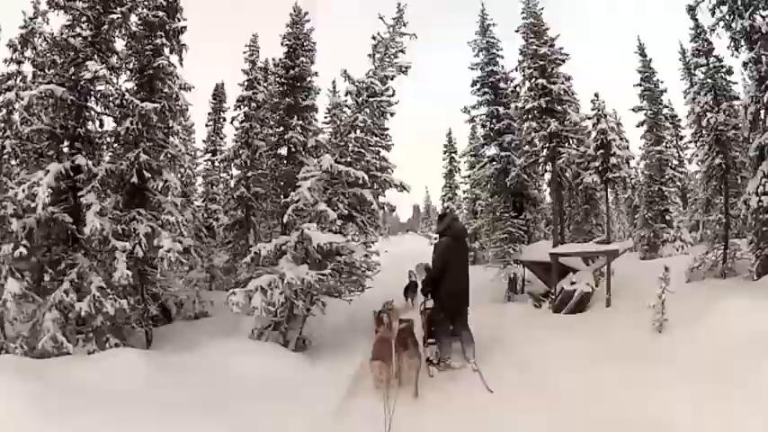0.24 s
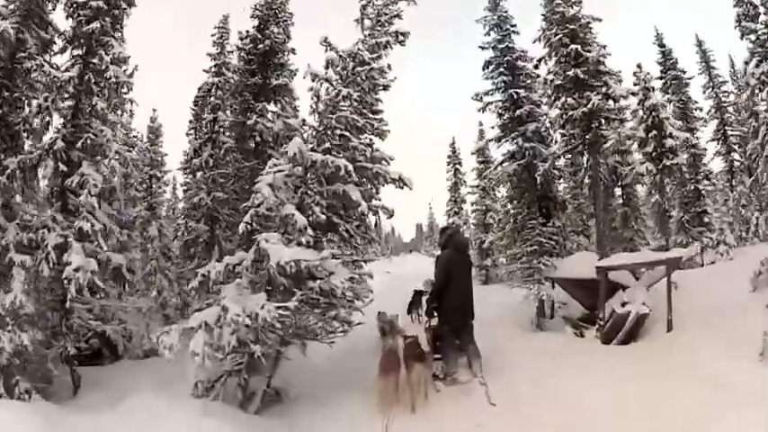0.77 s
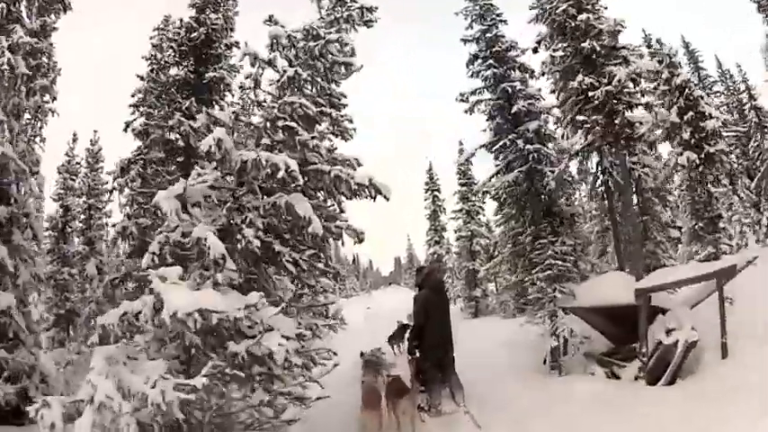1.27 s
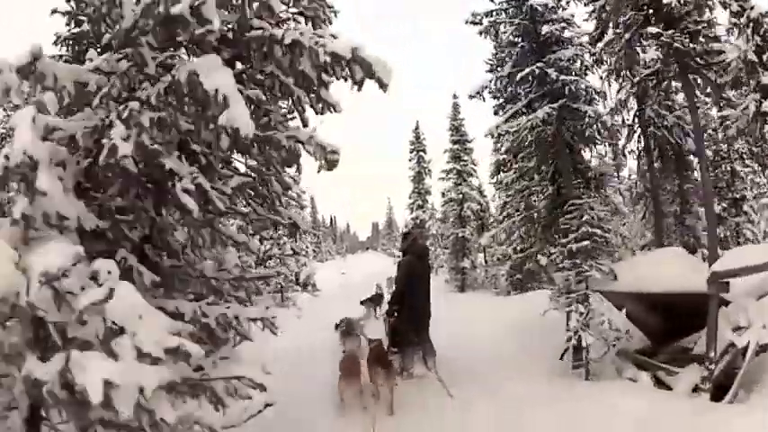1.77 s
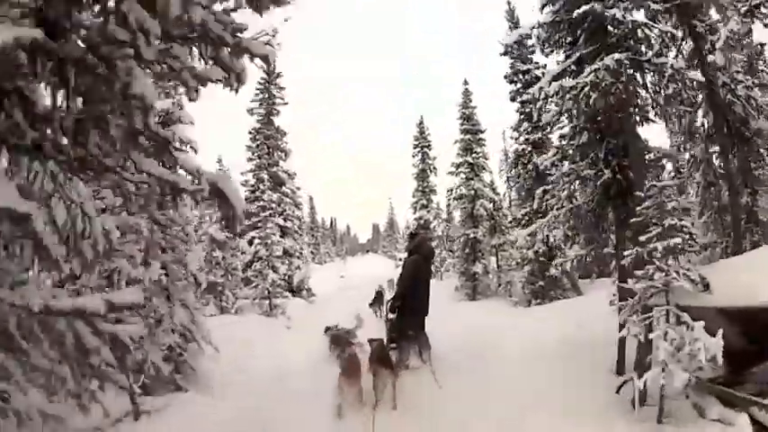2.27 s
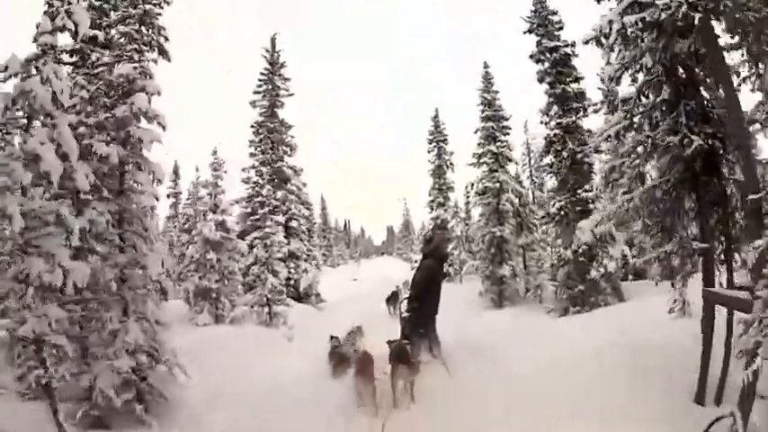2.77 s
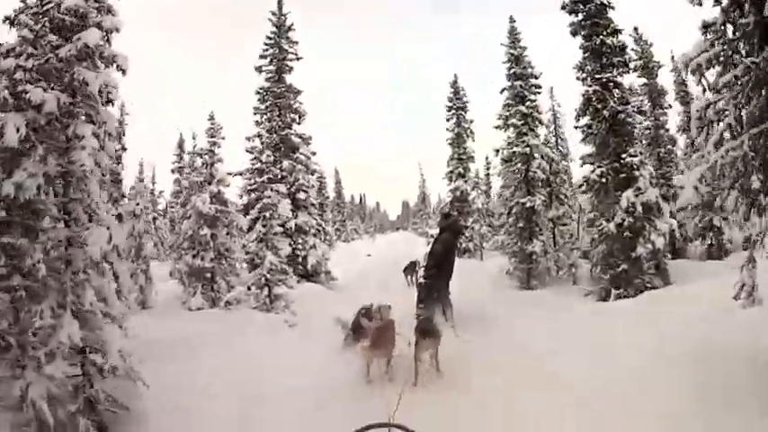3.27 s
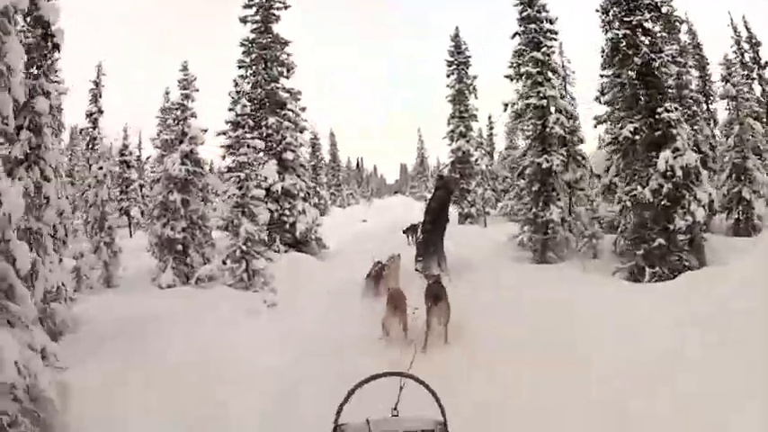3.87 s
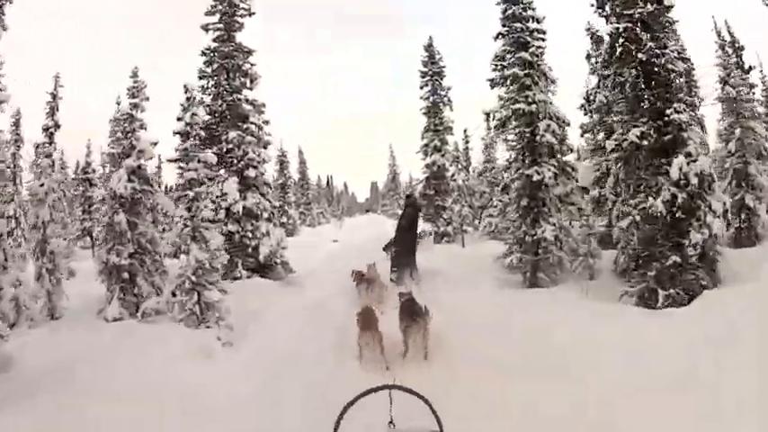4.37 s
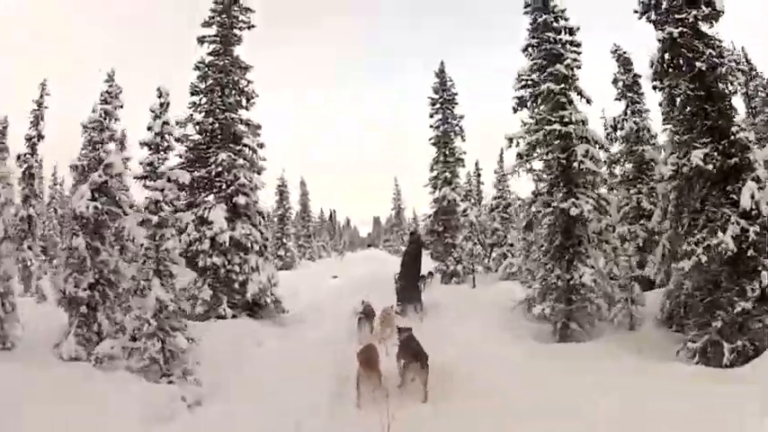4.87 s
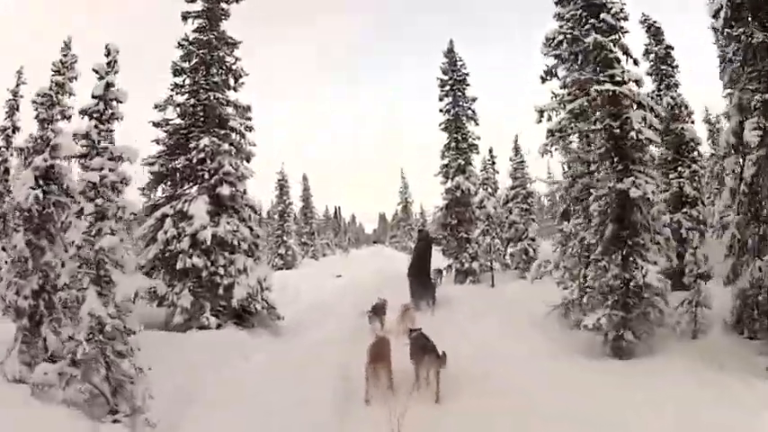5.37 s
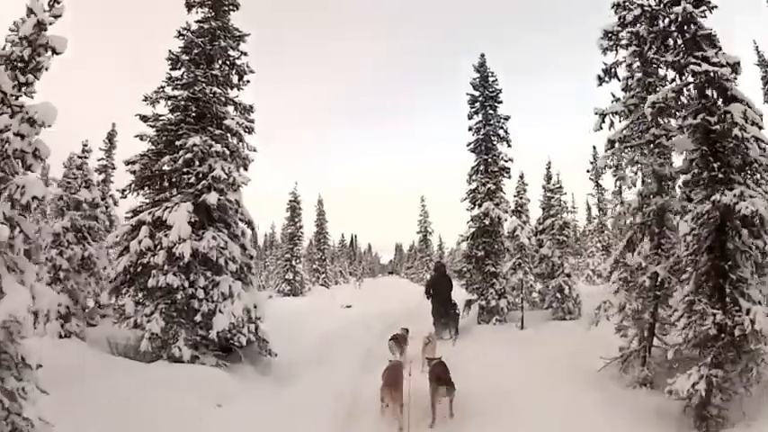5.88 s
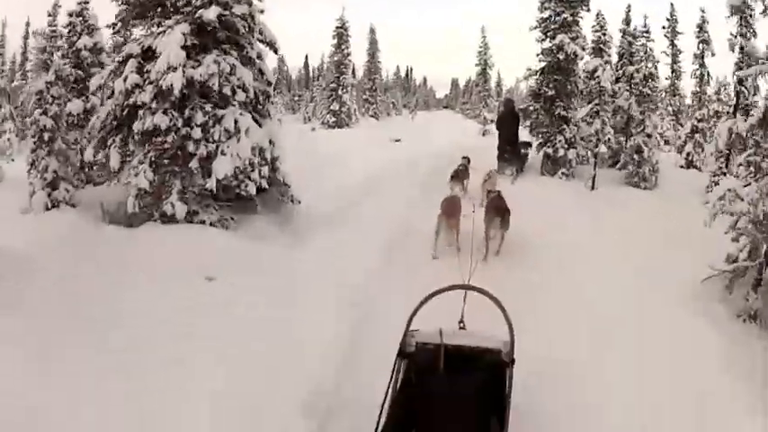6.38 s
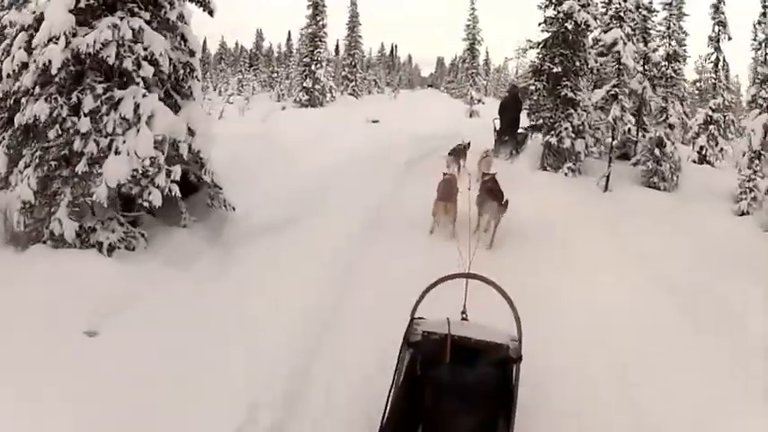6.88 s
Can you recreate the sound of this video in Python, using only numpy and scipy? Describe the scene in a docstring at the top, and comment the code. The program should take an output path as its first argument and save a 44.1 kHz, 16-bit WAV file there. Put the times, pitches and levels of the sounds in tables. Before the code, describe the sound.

Muffled low rumbling and hollow knocking of a dog sled gliding over a snowy forest trail, with soft wind thuds and faint snow hiss.

```python
"""Sled on a snowy forest trail

A sled glides along a trail, heard by a small camera in a sealed case. The frame is noise-driven resonances,
bumps ring the same modes, wind is deep lumpy noise, the runners hiss and a loose part ticks. Crust crunches,
cold snow squeaks and a branch brushes past over the microphone's own steady hiss. The converter holds each
of its 12000 samples a second, which mirrors the rumble into the treble."""
import sys
import numpy as np
from scipy import signal
from scipy.fft import rfft, irfft, next_fast_len
from scipy.io import wavfile
from scipy.ndimage import uniform_filter1d

SR = 44100
rng = np.random.default_rng(int(sys.argv[2]) if len(sys.argv) > 2 else 0)


def volts(x):
    """Linear amplitude factor 10**(x/20) for a level x in dB, scalar or array-like."""
    e = np.asarray(x, float) / 20
    return 10 ** e


def dump(signal):
    """Clip the signal to [-1, 1] and save it as 16-bit WAV at the path in sys.argv[1]."""
    limited = np.clip(np.atleast_2d(signal).T, -1, 1)
    pcm = np.round(limited * 32767).astype(np.int16)
    wavfile.write(sys.argv[1], SR, pcm)


N = 314874

# frame and case modes: (frequency [Hz], pole-pair width [Hz], relative level [dB])
FRAME_LOW = [(272.1, 37.9, 1.5), (313.8, 59, -1), (343.5, 94, -3)]
FRAME_HIGH = [(457, 93, 2), (524.4, 45.5, -0.5), (580.3, 110, -4.5), (681.4, 108, -9.5), (773, 177, -13)]
# runner mode: (frequency [Hz], pole-pair width [Hz], relative level [dB])
RUNNER = [(208.4, 57.5, 10.5)]
# how hard the trail shakes the runners: (time [s], level [dB])
LOAD = [(0.0, -23.5), (0.24, -19), (0.3, -21), (0.71, -21.5), (0.87, -26), (1.25, -26), (1.39, -19),
        (1.49, -26.5), (1.63, -20), (1.79, -28), (1.93, -20.5), (2.01, -27.5), (2.38, -19.5), (2.4, -23),
        (2.54, -24.5), (2.72, -20), (2.82, -29.5), (3.04, -24), (3.14, -27), (3.2, -19.5), (3.6, -23),
        (3.64, -16.5), (3.74, -28.5), (3.82, -19), (3.9, -26.5), (4.47, -32.5), (4.51, -25.5),
        (5.43, -28.5), (5.51, -22.5), (6.06, -25.5), (6.14, -32.5), (6.28, -29.5), (6.3, -22.5),
        (6.46, -36.5), (6.54, -24), (6.86, -17), (6.94, -25.5), (7.14, -21.5)]
LOAD_MID_DB = -25
# how hard the snow rubs under the runners: (time [s], level [dB])
GLIDE = [(0.04, -51), (0.32, -52.5), (0.4, -55), (0.41, -53.5), (1.14, -54), (1.26, -52), (2.29, -53),
         (2.35, -51.5), (2.45, -54.5), (2.75, -55), (2.79, -55), (3.82, -52.5), (3.84, -56.5),
         (4.13, -52.5), (4.37, -58), (4.41, -52.5), (4.77, -52), (4.96, -54), (5.75, -56), (5.89, -54),
         (6.11, -56.5), (6.76, -50.5), (6.94, -51.5), (6.98, -48), (7.04, -52), (7.14, -49.5)]


def evened(x):
    """Scales to rms 1."""
    return x / np.sqrt(np.mean(x ** 2) + 1e-20)


def curve_db(rows):
    """Level curve interpolated at every sample."""
    time_s, level_db = np.transpose(rows)
    return np.interp(np.arange(N) / SR, time_s, level_db)


def load_offset_db():
    """Trail load relative to its middle."""
    return curve_db(LOAD) - LOAD_MID_DB


def swells_db(rows, width_s):
    """Sum of Gaussian rises in dB, one for each row."""
    t = np.arange(N) / SR
    return sum(db * np.exp(-((t - s) / width_s) ** 2) for s, db in rows)


def lumps(per_s):
    """Twice-averaged noise of rms 1 that changes about per_s times a second."""
    window = int(SR / per_s)
    return evened(uniform_filter1d(uniform_filter1d(rng.standard_normal(N), window), window))


def lumpy(level, spread_db):
    """White noise whose level in dB follows the lumps."""
    return volts(spread_db * level) * rng.standard_normal(N)


def coloured(x, points):
    """Shapes x by a spectrum given at points, rms 1."""
    hz, db = np.transpose(points)
    size = next_fast_len(N)
    bins_hz = np.fft.rfftfreq(size, 1 / SR)
    gain = volts(np.interp(np.log(bins_hz + 1), np.log(hz + 1), db, -120, -120))
    return evened(irfft(rfft(x, size) * gain, size)[:N])


def ring(x, modes):
    """Resonances of alternating sign, each a pole pair applied twice; rms 1."""
    out = np.zeros(N)
    for k, (hz, width_hz, db) in enumerate(modes):
        b, a = signal.iirpeak(hz, hz / width_hz, SR)
        twice = signal.lfilter(b, a, signal.lfilter(b, a, x))
        out += (-1) ** k * volts(db) * evened(twice)
    return evened(out)


def struck(modes, t):
    """Decaying sines of alternating sign: the modes after one blow."""
    return sum((-1) ** k * volts(db) * np.exp(-np.pi * width_hz * t) * np.sin(2 * np.pi * hz * t)
               for k, (hz, width_hz, db) in enumerate(modes))


def resonance(x, hz, width_hz):
    """Shifts hz down to zero, smooths with one pole, shifts back."""
    turn = np.exp(2j * np.pi * hz * np.arange(len(x)) / SR)
    r = np.exp(-np.pi * width_hz / SR)
    return 2 * (turn * signal.lfilter([1 - r], [1, -r], x / turn)).real


def add(mix, s, sound):
    """Mixes a sound in at second s."""
    part = mix[round(s * SR):][:len(sound)]
    part += sound[:len(part)]


def frame(trail):
    """Uneven snow shakes the frame; all its modes share the same lumps of force."""
    # weight of the driver on the runner tails: (time [s], level [dB])
    lean_rows = [(0, -7), (.5, -3), (.9, -5.5), (1.35, -7.5), (1.7, -4.5), (2.35, -3.5), (2.5, -6),
                 (3.3, -3), (3.9, -2), (4.3, -10), (5.2, -6), (6.3, -10), (6.7, -10), (7.14, -2.5)]
    # sled bed modes: (frequency [Hz], pole-pair width [Hz], relative level [dB])
    bed_modes = [(112, 33, 2), (141.5, 27.5, 0.5)]
    # the bed bottoms out on the snow: (time [s], rise above its steady boom [dB])
    slap_rows = [(.04, 11.5), (.23, 9), (.7, 10), (1.55, 1), (2.27, 11.5), (2.58, 7), (3.2, 1.5),
                 (3.66, 9.5), (3.86, 14), (5.0, 7.5), (5.55, 8.5), (5.87, 5.5), (6.2, 10.5), (6.84, 6),
                 (6.95, 10.5)]
    slap_s = 0.039
    shift_per_s, shift_db = 5, 1.05  # the shaking shifts among the parts
    upper_db, upper_load_share, upper_lean_share = -35.5, 0.63, -0.081  # weight stills the upper frame
    upper_glide_share, glide_mid_db = 0.33, -51.5
    bed_db, bed_load_share, bed_lean_share = -39, 0.19, 0.26
    bed_gust_share, gust_mid_db = 0.38, -40

    shake = lumpy(trail, 1.56)
    load_db, lean_db = curve_db(LOAD), curve_db(lean_rows)
    shifts_db = [shift_db * lumps(shift_per_s) for _ in range(4)]

    runner = volts(load_db + lean_db + shifts_db[0]) * ring(shake, RUNNER)

    chatter_db = upper_glide_share * (curve_db(GLIDE) - glide_mid_db)  # rubbing snow makes the slats chatter
    high_db = upper_db + upper_load_share * load_offset_db() + chatter_db
    high_db = high_db + upper_lean_share * lean_db + shifts_db[1]
    high = volts(high_db) * ring(shake, FRAME_HIGH)

    low = volts(load_db - 4.0 + shifts_db[2]) * ring(shake, FRAME_LOW)

    boom_db = bed_db + bed_load_share * load_offset_db() + bed_gust_share * (gust_db() - gust_mid_db)
    boom_db = boom_db + bed_lean_share * lean_db + swells_db(slap_rows, slap_s) + shifts_db[3]
    bed = volts(boom_db) * ring(shake, bed_modes)
    return bed + runner - low + high  # neighbouring modes swing in opposite phase


def jolts():
    """Each bump rings the same modes of the frame, in its own proportions."""
    # bumps strike the frame: (time [s], level [dB], runner re low frame [dB], upper re low frame [dB])
    jolt_rows = [(0.098, -11.5, -19, -3), (0.203, -9, -4, -28), (0.245, -14.5, -7, -5),
                 (0.368, -14, -9, -25), (0.54, -6, -7.5, -20), (0.571, -28, -15, -8),
                 (0.612, -7.5, -12.5, -12.5), (0.665, -8, -6.5, -22), (0.711, -16, 1, -1),
                 (0.819, -14.5, -5, -1), (1.036, -16, -20, -6), (1.143, -15, -17, -13),
                 (1.267, -16, -17, -4), (1.318, -14, -20, -22), (1.39, -13, -19, -30),
                 (1.565, -11, -13, -26), (1.794, -11.5, -20, -28), (1.832, -19, -17, -6),
                 (1.894, -7.5, -24, -10.5), (2.036, -13.5, -20, -16), (2.169, -16.5, -1, -10),
                 (2.286, -24, -13, -11), (2.367, -14, -22, -14), (2.414, -21, -18, -1),
                 (2.611, -14, -20, -20), (3.018, -21, -14, -22), (3.052, -20.5, -7, 1),
                 (3.194, -8.5, -13, -15), (3.297, -11, -10, -14), (3.426, -10.5, -13, -30),
                 (3.52, -16, -18, -5), (3.754, -24, -18, -3), (3.797, -9.5, 0, -10),
                 (4.277, -20.5, -10, -11), (4.497, -18, -10, -7), (4.789, -15, -15, -12),
                 (4.88, -15, -29, -24), (4.991, -13.5, -15, -24), (5.092, -22, -14, -5),
                 (5.488, -19, -11, 2.5), (5.548, -10, -16, -9.5), (5.594, -25.5, -6, 7.5),
                 (5.651, -11.5, -29, -14.5), (6.029, -13, -31, -17), (6.064, -27, -26, 3),
                 (6.307, -10.5, -21, -12), (6.55, -7.5, -29, -16.5), (6.688, -12, -15, -18),
                 (6.797, -15, -22, 2), (7.087, -26, -3, -16)]
    rise_s = 0.0053
    out, t = np.zeros(N), np.arange(SR // 6) / SR
    runner, low, high = (struck(modes, t) for modes in (RUNNER, FRAME_LOW, FRAME_HIGH))
    rise = np.minimum(t / rise_s, 1)
    for s, db, runner_db, upper_db in jolt_rows:
        add(out, s, volts(db) * rise * (low + volts(runner_db) * runner + volts(upper_db) * high))
    return out


def gust_db():
    """Wind strength: the steady wind with each buffet as a short swell."""
    # steady wind on the case: (time [s], level [dB])
    steady_rows = [(0, -30), (.6, -45), (1.4, -36), (1.8, -39.5), (2.1, -44.5), (3, -48.5), (3.6, -52),
                   (4.1, -42.5), (4.7, -52.5), (5.1, -37.5), (6.6, -40), (6.9, -30), (7.14, -29.5)]
    # single buffets: (time [s], rise above the steady wind [dB])
    buffet_rows = [(.04, 4), (.3, 10), (.52, 16.5), (1.25, 2), (1.57, 14.5), (2.33, 10), (2.84, 6),
                   (3.24, 9), (4.12, 4), (4.38, 9), (4.86, 10), (6.16, 7), (6.4, 1), (6.8, 5), (7.03, 6.5)]
    return curve_db(steady_rows) + swells_db(buffet_rows, width_s=.04)


def wind():
    """Wind thuds on the case: lumpy noise with a deep spectrum."""
    # (frequency [Hz], relative level per Hz [dB])
    wind_points = [(12, -20), (25, -9.5), (45, -9.5), (70, -7), (95, -7.5), (140, -35)]
    return volts(gust_db()) * coloured(lumpy(lumps(11.0), 1.0), wind_points)


def runners(trail):
    """Fine hiss with scattered snow grains, coloured by the air in the case."""
    # (frequency [Hz], relative level per Hz [dB])
    hiss_points = [(530, -50), (900, -5), (1170, -6.5), (1610, -8.5), (1980, -6.5), (2770, -8), (3140, -11),
                   (3570, -10), (3890, -20.5), (4850, -16.5), (5900, -22.5), (7670, -60), (13000, -120)]
    # air resonances in the case: (frequency [Hz], pole-pair width [Hz], relative level [dB])
    case_modes = [(2753, 450, 1), (4600, 170, -11)]
    grains_per_s, load_share = 300, .1
    sizes_db = 13 + 1.45 * np.minimum(rng.exponential(1, N), 3)
    grains = volts(sizes_db) * (rng.random(N) < grains_per_s / SR) * rng.choice([-1, 1], N)
    snow = lumpy(trail, 1.3) + grains
    wander = volts(1.3 * lumps(2.0))  # the case colour comes and goes
    level_db = curve_db(GLIDE) + load_share * load_offset_db()
    return volts(level_db) * (coloured(snow, hiss_points) + volts(-18) * wander * ring(snow, case_modes))


def ticks():
    """A loose part, plastic on plastic: a brief ring and two bounces, plus faint rattling in between."""
    # (time [s], peak level [dB], loss at each bounce [dB])
    tick_rows = [(0.0118, -31.5, 12), (0.0977, -43, 12), (0.158, -46, 12), (0.162, -42, 14),
                 (0.2264, -40, 12), (0.247, -29.5, 8), (0.259, -34, 12), (0.3087, -46, 12),
                 (0.343, -42, 12), (0.3636, -42, 10), (0.4164, -43, 10), (0.4233, -30.5, 7),
                 (0.4923, -40, 14), (0.5242, -44, 12), (0.5733, -40, 9), (0.578, -41, 7), (0.634, -44, 10),
                 (0.6923, -48, 12), (0.7004, -43, 9), (0.837, -39, 7), (0.8632, -33.5, 12),
                 (0.9916, -43, 12), (1.5988, -34, 9), (1.668, -37, 12), (1.6945, -37, 12),
                 (1.7912, -32.5, 9), (2.3381, -39.5, 12), (2.8515, -37.5, 16), (3.1597, -35, 16),
                 (3.24, -43, 9), (3.2962, -37, 16), (3.321, -39, 12), (3.3354, -39, 12), (3.4665, -43, 12),
                 (3.725, -37.5, 6), (3.7354, -41, 12), (3.8606, -43, 10), (3.9408, -34, 14),
                 (3.996, -39, 14), (4.224, -29, 6.5), (4.8604, -32, 10), (5.3737, -43, 6),
                 (5.4131, -39.5, 12), (6.3135, -36.5, 5), (6.792, -44, 14.5)]
    # (frequency [Hz], relative level [dB], t60 [s])
    tick_modes = [(5100, 3, 0.0048), (4780, -6, 0.0091), (2760, -9.5, 0.01), (3740, -17, 0.013)]
    rise_s, first_flight_s, flight_ratio = .0011, .007, .7
    rattles_per_s, rattle_load_share = 70, .4

    t = np.arange(SR // 40) / SR
    tick = sum(volts(db - 60 * t / t60_s) * np.sin(2 * np.pi * hz * t) for hz, db, t60_s in tick_modes)
    tick *= np.sin(np.minimum(t / rise_s, 1) * np.pi / 2) ** 2

    rattle_db = -77 + 2.6 * np.minimum(rng.exponential(1, N), 3) + rattle_load_share * load_offset_db()
    taps = volts(rattle_db) * (rng.random(N) < rattles_per_s / SR)
    for s, db, lost_db in tick_rows:
        for k, after_s in enumerate((0, first_flight_s, first_flight_s * (1 + flight_ratio))):
            taps[round((s + after_s) * SR)] += volts(db - k * abs(lost_db)) / abs(tick).max()
    return signal.oaconvolve(taps, tick)[:N]


def crunches():
    """Crusts of snow crunch under a runner: short broad bursts of twice-resonated noise."""
    # (time [s], level [dB])
    crunch_rows = [(0.72, -47.5), (1.332, -49), (1.8805, -44), (2.6986, -47), (2.9494, -50), (3.8029, -49),
                   (4.694, -45), (4.7794, -49), (5.1794, -50), (5.2704, -48), (5.4291, -45.5),
                   (5.6497, -45), (5.863, -43.5), (6.6648, -47), (6.7482, -46), (6.7915, -43.5),
                   (6.9694, -48)]
    hz, width_hz, rise_s, t60_s = 2050, 1800, 0.002, 0.07
    out, t = np.zeros(N), np.arange(SR // 8) / SR
    swell = np.minimum(t / rise_s, 1) * volts(-60 * t / t60_s)
    for s, db in crunch_rows:
        puff = rng.standard_normal(len(t))
        crust = evened(resonance(resonance(puff, hz, width_hz), hz, width_hz))
        add(out, s, volts(db) * swell * crust)
    return out


def squeaks():
    """Cold snow squeaks: each swells in about a hundredth of a second and dies away at one pitch."""
    # (time [s], level [dB], pitch [Hz])
    squeak_rows = [(.30, -47, 1520), (.81, -47, 2400), (1.86, -44, 1860), (1.925, -46, 1310)]
    rise_s, t60_s = .012, .16
    out, t = np.zeros(N), np.arange(SR // 8) / SR
    rise = np.minimum(t / rise_s, 1)
    for s, db, hz in squeak_rows:
        add(out, s, volts(db - 60 * t / t60_s) * rise * np.sin(2 * np.pi * hz * t))
    return out


def branch():
    """Needles and snow brush along the case: coloured noise swelling and fading."""
    # (frequency [Hz], relative level per Hz [dB])
    brush_points = [(2800, -26), (3600, -4), (4200, -4), (4800, 0), (5400, -3), (5900, -11.5)]
    middle_s, level_db, rise_s, fall_s = 2.14, -54.5, 0.11, 0.085
    t = np.arange(N) / SR - middle_s
    swell = np.exp(-(t / np.where(t < 0, rise_s, fall_s)) ** 2)
    return volts(level_db) * swell * coloured(lumpy(lumps(200), 1.2), brush_points)


def mic_hiss():
    """Microphone self-noise: white noise shaped by a fixed spectrum."""
    # (frequency [Hz], relative level per Hz [dB])
    floor_points = [(2500, -23), (4000, 9), (4800, 12), (5500, -7), (5900, -12)]
    return volts(-67) * coloured(rng.standard_normal(N), floor_points)


def scene():
    """Every source reaches the one microphone through the case; its own hiss is added."""
    trail = lumps(53)  # lumps of force shared by frame and runners
    sled = frame(trail) + jolts() + runners(trail) + ticks()
    snow = crunches() + squeaks()
    return (sled + wind() + snow + branch() + mic_hiss())[None]


def low_pass(x):
    """Removes everything above the highest recorded frequency."""
    return signal.sosfilt(signal.butter(12, 16410, fs=SR, output="sos"), x)


def record(dry):
    """Each slow sample is repeated four times with no smoothing, so images flank 12 kHz; then a band limit."""
    held_hz, play_hz, edge_hz = 12000, 48000, 15350
    padded = np.pad(dry, ((0, 0), (0, 1470)), "reflect")
    slow = signal.resample_poly(padded, held_hz, SR, axis=1, window=("kaiser", 8))
    held = np.repeat(slow, play_hz // held_hz, axis=1)
    steps = signal.resample_poly(held, SR, play_hz, axis=1, window=("kaiser", 8))
    lowpass = signal.firwin(301, edge_hz, window=("kaiser", 7), fs=SR)
    limited = signal.oaconvolve(steps, lowpass[None], "same")
    return low_pass(limited[:, :N])


dry = scene()
out = record(dry)
dump(out)
```